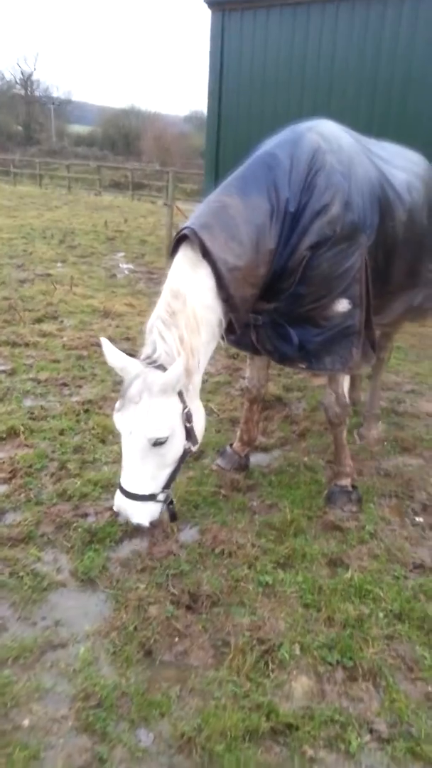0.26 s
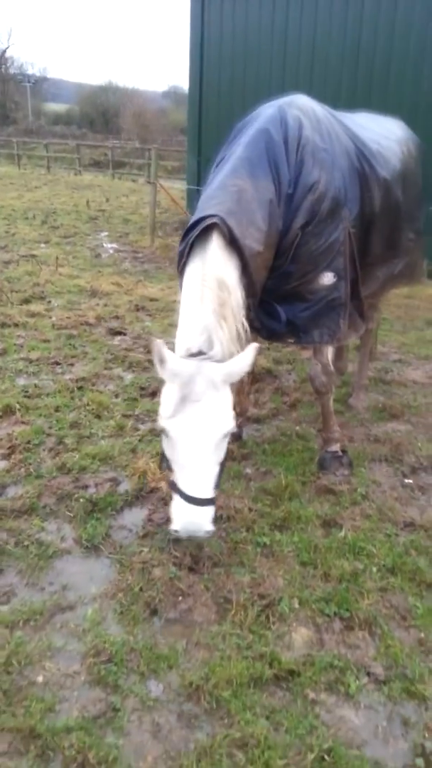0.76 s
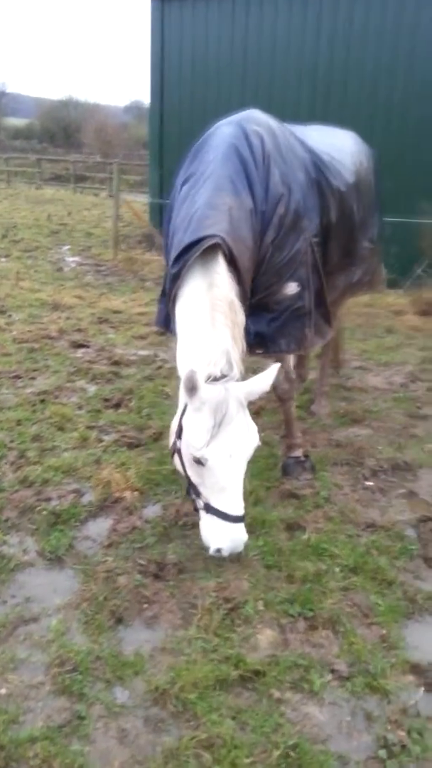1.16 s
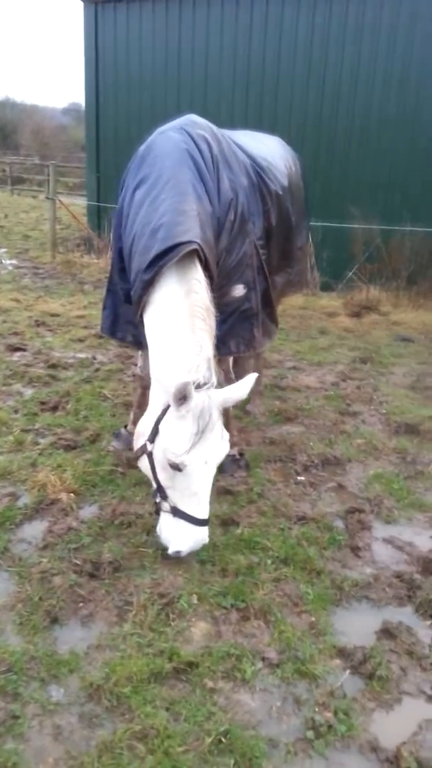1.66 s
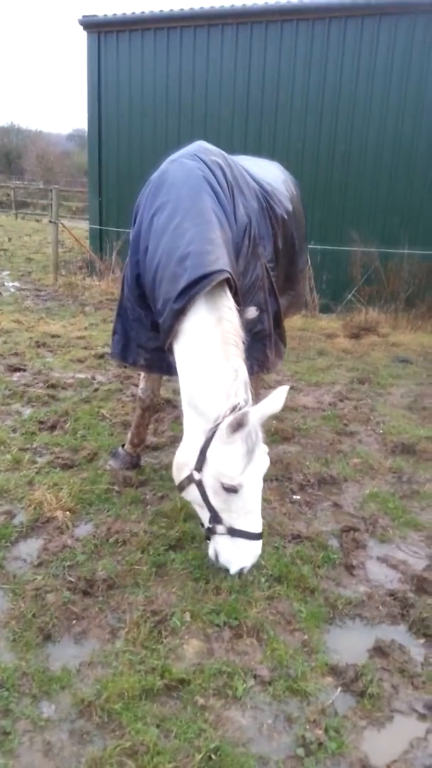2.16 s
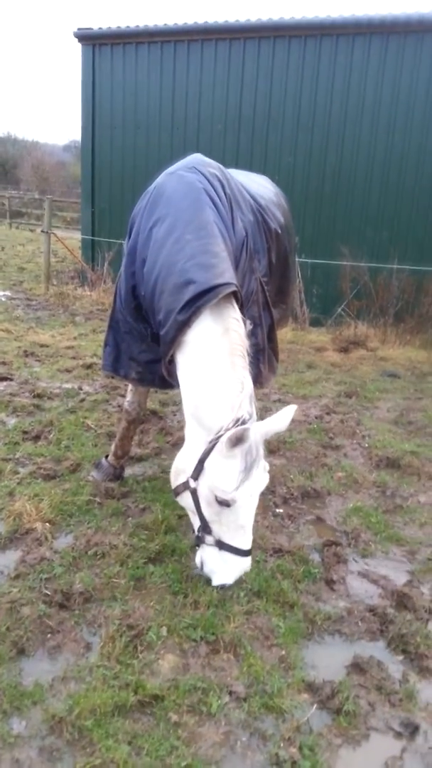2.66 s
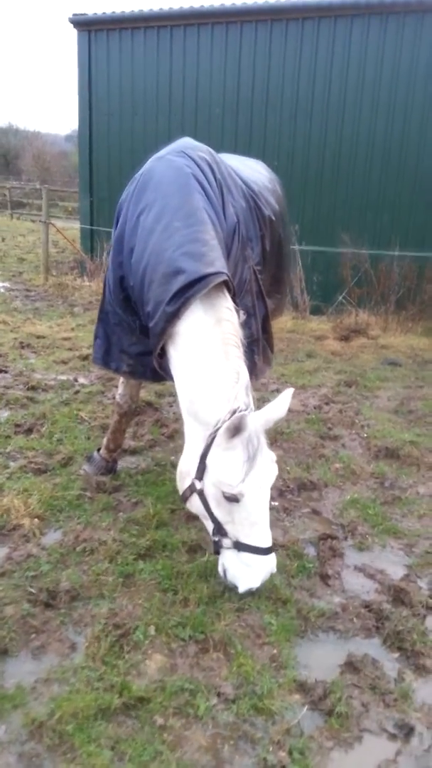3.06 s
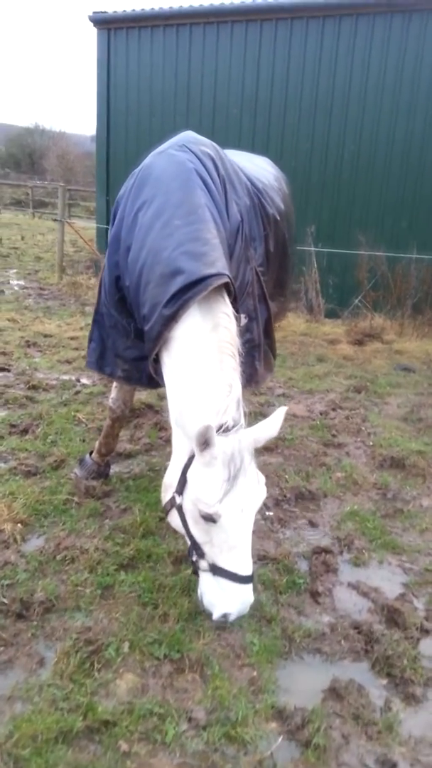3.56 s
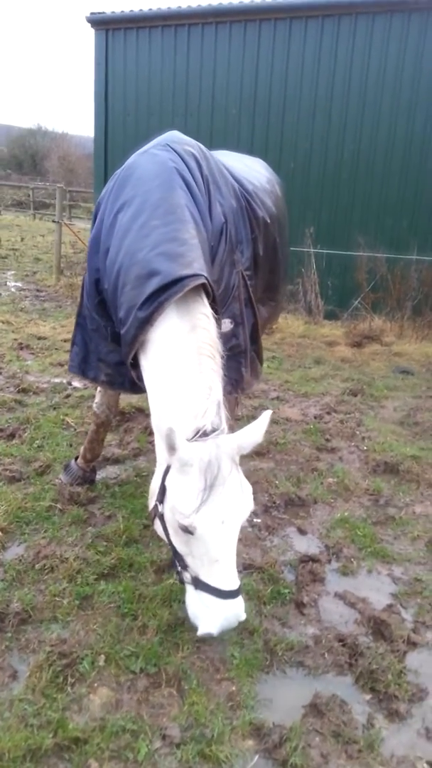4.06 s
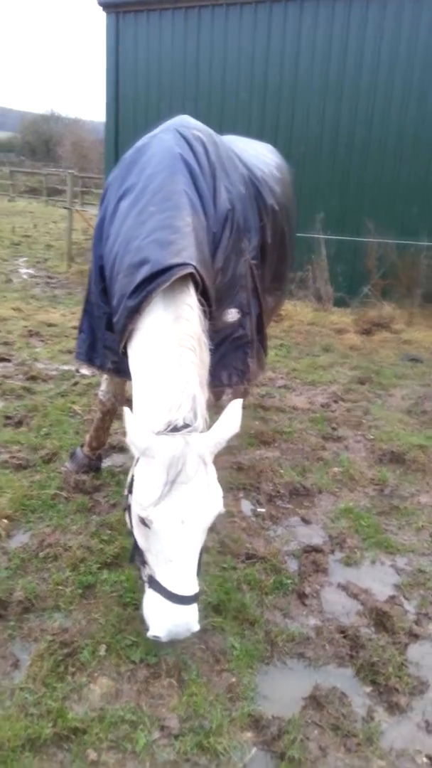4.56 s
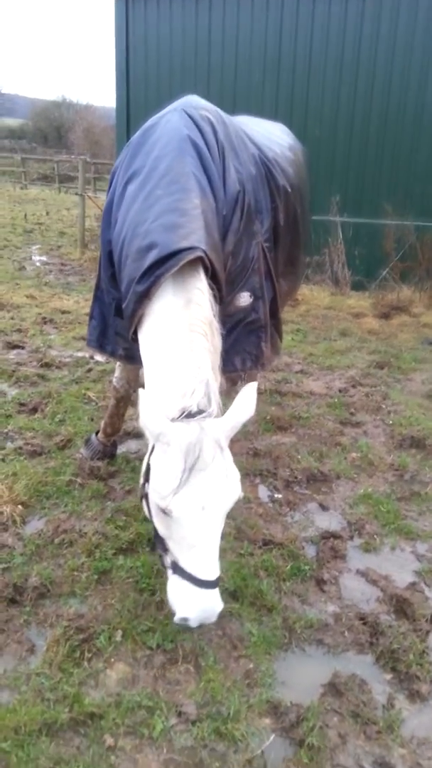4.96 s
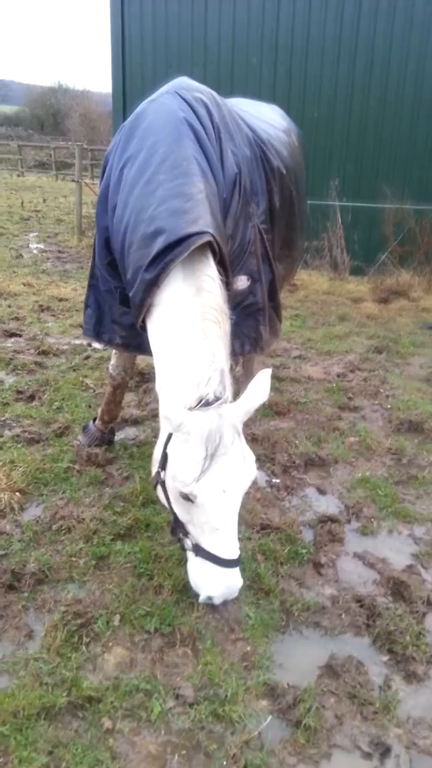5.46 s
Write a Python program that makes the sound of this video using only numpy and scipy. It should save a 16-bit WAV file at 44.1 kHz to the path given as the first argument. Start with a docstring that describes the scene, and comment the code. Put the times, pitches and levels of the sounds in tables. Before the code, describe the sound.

A grazing horse snorts three times up close, with ticking grass and wind buffeting the microphone.

```python
"""A wet paddock, a stereo microphone close to a grazing horse; grass ticks, the countryside hisses far off.
At 0.2 s the muzzle crunches in the turf and the horse snorts: each nostril flutters at its own rate near
30 a second, drifting in and out of step; every flap rings the nasal passage and lets out a puff of air.
Wind buffets the microphone ports, hardest at 1.8 s. Another crunch at 2.4 s leads to a second snort at
2.8 s. The third and longest runs from 4.1 to 5 s, then only grass, wind and the far field are left."""
import sys
import numpy as np
from scipy import signal
from scipy.io import wavfile
from scipy.ndimage import uniform_filter1d

SR = 44100
rng = np.random.default_rng(int(sys.argv[2]) if len(sys.argv) > 2 else 0)


def materialize(psi):
    """Save the field psi as 16-bit PCM at rate SR to the path in sys.argv[1].

    A 1-D psi becomes a single channel; in a 2-D psi each row is a channel.
    """
    bounded = np.clip(np.atleast_2d(psi).T, -1, 1)
    quanta = np.round(bounded * 32767).astype(np.int16)
    wavfile.write(sys.argv[1], SR, quanta)


N = 251811
TIME_S = np.arange(N) / SR


def amp(db):
    """Decibels to gain."""
    return 10 ** (np.asarray(db) / 20)


def rms_one(x):
    """Scale to unit rms."""
    return x / np.sqrt(np.mean(x ** 2) + 1e-20)


def filtered(x, order, hz, kind="low"):
    """Butterworth filter."""
    return signal.sosfilt(signal.butter(order, hz, kind, fs=SR, output="sos"), x)


def in_time(rows):
    """Columns of a curve, sample by sample."""
    times, *columns = np.transpose(rows)
    return [np.interp(TIME_S, times, column) for column in columns]


def at_hz(points, hz):
    """Read a spectrum on a log-frequency axis."""
    frequencies, values = np.transpose(points)
    return np.interp(np.log(hz), np.log(frequencies), values)


def drift(rate_hz):
    """Slow random wander of rms 1."""
    step = 40
    r = np.exp(-2 * np.pi * step * rate_hz / SR)
    slow = signal.lfilter([1], [1, -2 * r, r * r], rng.standard_normal(N // step + 2002))[2000:]
    return np.interp(np.arange(N) / step, np.arange(len(slow)), rms_one(slow))


def ring(x, hz, width_hz):
    """A resonance: each click starts a dying sine."""
    r, w = np.exp(-np.pi * width_hz / SR), 2 * np.pi * hz / SR
    return signal.lfilter([0, np.sin(w)], [1, -2 * r * np.cos(w), r * r], x + 1e-18)


def ring_twice(x, hz, width_hz):
    """A resonance with steep skirts."""
    return ring(ring(x, hz, width_hz), hz, width_hz)


def decay(clicks, time_s):
    """Give each click an exponential tail."""
    return signal.lfilter([1], [1, -np.exp(-1 / (time_s * SR))], clicks)


def swell(middle_s, length_s):
    """A stretch of time and a bell-shaped envelope on it."""
    near = slice(round((middle_s - .1) * SR), round((middle_s + .15) * SR))
    return near, np.exp(-((TIME_S[near] - middle_s) / (.7 * length_s)) ** 2)


def panned(x, pan_db, lag_s=0.00015):
    """Sound reaches the microphone's left port first; pan_db is left minus right."""
    samples = np.arange(len(x))
    late = np.interp(samples - lag_s * SR, samples, x)
    return np.array([x * amp(pan_db / 2), late * amp(-pan_db / 2)])


def banded_noise(spectrum, likeness, patchy_db, flicker_hz):
    """Stereo noise of rms 1 in flickering half-octave bands; likeness is left-right correlation."""
    out, together = 0, drift(flicker_hz)
    edges = 20 * 2 ** np.arange(0, 10, .5)
    white = rng.standard_normal((2, 2, N))
    for k, (low, high) in enumerate(zip(edges, edges[1:])):
        mid, side = filtered(white[k % 2], 2, [low, high], "band")
        hz = np.sqrt(low * high)
        alike = np.clip(at_hz(likeness, hz), -1, 1)
        gain = amp(at_hz(spectrum, hz) + patchy_db * (.5 * together + drift(flicker_hz)))
        out = out + gain * (np.sqrt(1 + alike) * mid + np.sqrt(1 - alike) * side * [[1], [-1]])
    top = filtered(white[1], 2, edges[-1], "high")
    return rms_one(out + np.sqrt(2) * amp(at_hz(spectrum, edges[-1])) * top)


FIELD_SPECTRUM = [(59, -44), (100, -53), (211, -3), (366, 11), (400, -16.5), (504, 3), (844, 3),
                  (991, -0.5), (1490, -3.5), (1910, -3), (2450, -18), (7000, -28), (9100, -62),
                  (15400, -120)]  # distant countryside: frequency_hz, relative_db
FIELD_WIDTH = [(60, 0.3), (130, 0.72), (290, 0.76), (640, 0.63), (1410, -0.032), (3100, 0.62),
               (6820, -0.97), (15000, 1)]  # its stereo image: frequency_hz, likeness
FIELD_LEVEL = [(0.0, -48), (0.9, -45.5), (2.3, -49), (2.9, -47), (3.9, -50), (4.9, -48), (5.71, -50.5)]  # its rise and fall: time_s, level_db


def far_field():
    """The countryside hisses far beyond the paddock, a little to the right."""
    level_db, = in_time(FIELD_LEVEL)
    noise = banded_noise(FIELD_SPECTRUM, FIELD_WIDTH, patchy_db=.8, flicker_hz=5)
    return amp(level_db) * noise * amp([[-1.5], [1.5]])


WIND_SPECTRUM = [(20, -25), (40, -6), (70, -3.5), (130, 1.5), (250, -5), (450, -33), (900, -54),
                 (2000, -100)]  # wind on the microphone: frequency_hz, relative_db
PORT_GUSTS = [(0.021, 0.11, -33.5, 0), (0.34, 0.17, -34, 1), (0.75, 0.47, -38, 1), (0.934, 0.12, -39, 0),
              (1.147, 0.11, -37, 1), (1.356, 0.2, -42.5, 1), (1.614, .15, -33.5, 1), (1.8, 0.079, -26.5, 1),
              (2.11, 0.11, -37.5, 1), (2.29, 0.13, -52, 0), (2.546, 0.21, -39.5, 1),
              (2.647, 0.28, -43.5, 0), (2.94, 0.15, -35, 1), (3.244, 0.2, -37, 1), (3.404, .2, -53, 0),
              (4.11, 0.12, -44, 1), (5.03, 0.23, -49, 1), (5.054, 0.17, -51, 0), (5.35, 0.23, -54, 0),
              (5.618, 0.15, -43, 1), (5.666, .1, -46, 0)]  # gusts on one port: middle_s, length_s, level_db, port (0 left, 1 right)
EDDIES = [(0.253, -20, 200), (0.899, -22.5, 170), (0.92, -21.5, 208), (0.928, -19.5, 255),
          (1.111, -30, 169), (1.171, -29, 245), (1.377, -26, 206), (1.554, -23, 152), (1.563, -23, 195),
          (1.597, -29, 249), (1.709, -23.5, 205), (1.755, -15, 262), (1.762, -14.5, 201),
          (1.797, -15.5, 280), (1.823, -26, 172), (2.481, -26.5, 163), (2.596, -23.5, 185),
          (2.609, -25, 192), (5.016, -22, 142), (5.577, -20, 237)]  # slaps on the right port: start_s, level_db, pitch_hz


def wind(calm_db=-54.5, eddy_left_db=-38):
    """Right on the microphone, gusts swell a lumpy rumble and each eddy is one pressure swing."""
    lumps = banded_noise(WIND_SPECTRUM, [(20, 0), (40, 0.071)], patchy_db=3.5, flicker_hz=24)
    force = np.full((2, N), amp(calm_db))
    for middle_s, length_s, db, port in PORT_GUSTS:
        force[round(port)] += amp(db) * np.exp(-(2 * (TIME_S - middle_s) / length_s) ** 2)
    out = force * rms_one(filtered(lumps, 3, [32, 480], "band"))
    for start_s, db, hz in EDDIES:
        cycles = np.arange(-2, 2, hz / SR)
        swing = -np.sin(2 * np.pi * cycles) * np.exp(-(cycles / 0.36) ** 2)
        at = round(start_s * SR + SR / hz / 2) - len(swing) // 2
        out[:, at:at + len(swing)] += 2 * amp(db) * swing * [[amp(eddy_left_db)], [1]]
    return out


def scatter(x, t60_s=0.34, level_db=-20.5):
    """Ground and shed wall return a short dull tail, unrelated at the two ports."""
    t = TIME_S[:round(.4 * SR)]
    tail = rng.standard_normal((2, len(t))) * amp(-60 * t / t60_s) * (t > .006)
    tail = filtered(tail, 1, 2500)
    tail /= np.sqrt(np.sum(tail ** 2, axis=1, keepdims=True))
    return amp(level_db) * signal.fftconvolve(x, tail, axes=1)[:, :N]


GRASS_LEVEL = [(0.0, -54.5), (0.2, -47), (0.9, -55.5), (1.17, -52.5), (1.35, -57), (1.52, -50.5),
               (1.85, -58.5), (2.45, -55.5), (3.6, -62), (5.71, -60.5)]  # grass at the muzzle: time_s, level_db


def rustle(grains_per_s=2500):
    """The muzzle brushes the grass: dense soft grains, mostly at the right port."""
    grains = rng.standard_normal((2, N)) * (rng.random((2, N)) < grains_per_s / SR)
    band = rms_one(filtered(grains, 2, (1380, 4450), "band"))
    level_db, = in_time(GRASS_LEVEL)
    return amp(level_db + 2.6 * drift(4.7)) * band * amp([[-3], [3]])


def ticks(rows, damping):
    """Each tick is a click and a brief ring; damping is width over pitch."""
    length = 400
    out = np.zeros((2, N + length))
    click = filtered(signal.unit_impulse(length), 2, 900, "high")
    for start_s, db, hz, pan_db in rows:
        at = round(start_s * SR)
        out[:, at:at + length] += panned(amp(db) * ring(click, hz, damping * hz), pan_db)
    return out[:, :N]


def faint_ticks(per_s=25, base_db=-45):
    """The wet turf ticks weakly at random moments and pitches."""
    when, strength, pitch, side = rng.random((round(per_s * N / SR), 4)).T
    level_db = base_db - 5 * np.log(strength + .05)
    return ticks(zip(when * N / SR, level_db, 1500 * 4.5 ** pitch, 3 - 12 * side), damping=0.15)


GRASS_TICKS = [(0.1258, -27.5, 2470), (0.1521, -20, 3100), (1.086, -32, 4600), (1.1117, -23, 4000),
               (1.1707, -14.5, 1660), (1.6228, -18.5, 1780), (1.6672, -18, 4030), (1.68, -23, 4800),
               (1.8278, -17.5, 1420), (2.2302, -20, 1630), (2.2743, -27, 2840), (2.6503, -22.5, 2200),
               (2.77, -17.5, 1810), (2.9511, -11, 2360), (3.3884, -11.5, 1430), (3.4056, -14, 1660),
               (3.481, -21.5, 3100), (3.5365, -21, 2570), (3.5795, -23, 4080), (3.7106, -24.5, 1880),
               (3.9936, -18.5, 1400), (4.2104, -11, 2630), (4.9123, -13.5, 2320), (5.2882, -24, 1570),
               (5.329, -22.5, 2060), (5.4343, -24.5, 1700), (5.5726, -15.5, 2260), (5.6007, -22, 4950)]  # the loudest ticks: start_s, level_db, pitch_hz


def grass_ticks(pan_db=-11.5):
    """Grass and droplets tick sharply to the right of the microphone."""
    return ticks([(*row, pan_db) for row in GRASS_TICKS], damping=1.0)


TURF_CRUNCHES = [(0.18, -36, 1710, 0.032, -19), (0.189, -19, 1224, 0.012, -3),
                 (0.218, -25.5, 1390, 0.027, -6.5), (2.418, -28, 955, 0.0037, -20),
                 (2.429, -15, 953, 0.0098, -9), (2.44, -21.5, 1010, 0.0026, -4)]  # muzzle in wet turf: middle_s, peak_db, pitch_hz, length_s, pan_db
POCKET_MODES = [(1, 228, 9.5), (2.02, 276, 3.5), (3.0, 352, -1.5), (3.85, 433, -4)]  # rings of a pocket in the turf: pitch_ratio, width_hz, level_db


def crunches(grains_per_s=5000):
    """The muzzle crunches the turf: a short swell of grains rings a pocket and its overtones."""
    out = np.zeros((2, N))
    grains = rng.standard_normal(N) * (rng.random(N) < grains_per_s / SR)
    grains = np.diff(grains, prepend=0)
    for middle_s, db, hz, length_s, pan_db in TURF_CRUNCHES:
        near, bell = swell(middle_s, length_s)
        rung = sum(amp(mode_db) * ring(grains[near] * bell, ratio * hz, width)
                   for ratio, width, mode_db in POCKET_MODES)
        rung = filtered(rung, 2, 3200)
        out[:, near] += panned(amp(db) * rung / np.abs(rung).max(), pan_db)
    return out


MUCUS_SQUEAKS = [(0.317, -23, 2800, 0.0062), (0.339, -32, 4700, 0.0032), (0.365, -29, 2540, 0.0036),
                 (0.37, -23, 2540, 0.0012), (0.441, -34, 2070, .003), (0.942, -37.5, 3040, 0.0089),
                 (2.99, -32.5, 2750, 0.0039), (3.265, -31.5, 3680, 0.0037), (3.278, -34, 4500, .008),
                 (4.399, -32, 3800, .006), (4.414, -28, 3270, 0.012), (4.448, -32, 3370, 0.014)]  # wet squeaks in the nose: middle_s, level_db, pitch_hz, length_s


def squeaks():
    """Mucus squeaks in the air stream: short swells of noise through one resonance, hard right."""
    out, noise = np.zeros(N), rng.standard_normal(N)
    for middle_s, db, hz, length_s in MUCUS_SQUEAKS:
        near, bell = swell(middle_s, length_s)
        rung = ring_twice(noise[near] * bell, hz, 0.3 * hz)
        out[near] += amp(db) * rung / np.abs(rung).max()
    return panned(out, pan_db=-25.5)


def flaps(nostril, level_db, jitter_s, uneven_db=1.0, lead_s=.0018):
    """One click each time a nostril's flutter completes a turn, a little uneven in time and strength."""
    clicks = np.zeros(N)
    for rows in nostril:
        rate, = in_time(rows)
        start, end = round(rows[0][0] * SR), round(rows[-1][0] * SR)
        turns = np.floor(np.cumsum(rate[start:end]) / SR)
        at = start + np.flatnonzero(np.diff(turns, prepend=-1))
        timing, strength = rng.standard_normal((40, 2))[:len(at)].T
        shift = np.round((jitter_s * timing - lead_s) * SR).astype(int)  # the flap leads its ring's peak
        clicks[at + shift] = amp(level_db[at] + uneven_db * strength)
    return clicks


FIRST_FLUTTER = [
    [(0.279, 29.3), (0.373, 29.9), (0.466, 29.4), (0.56, 29.7), (0.654, 30.7), (0.748, 29.2), (0.841, 27.7),
     (0.935, 25.8)],
    [(2.836, 31.3), (2.915, 32.3), (2.994, 29.7), (3.073, 30.1), (3.151, 30.9), (3.23, 33.7), (3.309, 32.5),
     (3.388, 24.5)],
    [(4.167, 33.2), (4.243, 36.2), (4.319, 33.9), (4.395, 34.9), (4.471, 37.0), (4.547, 38.4),
     (4.623, 38.3), (4.699, 38.5), (4.775, 33.7), (4.851, 34.9), (4.927, 30.2)],
]  # first nostril, a list per snort: time_s, flaps_per_s
SECOND_FLUTTER = [
    [(0.289, 34.8), (0.39, 28.2), (0.49, 25.5), (0.591, 25.8), (0.692, 26.9), (0.792, 24.7), (0.893, 23.1)],
    [(2.825, 30.1), (2.921, 27.6), (3.018, 27.3), (3.114, 26.4), (3.21, 29.3), (3.307, 29.2), (3.403, 24.4)],
    [(4.228, 31.9), (4.316, 30.3), (4.404, 30.1), (4.492, 34.5), (4.58, 33.4), (4.668, 34.0), (4.756, 32.5),
     (4.844, 30.1), (4.932, 20.9)],
]  # second nostril, a list per snort: time_s, flaps_per_s
FLAP_STRENGTH = [
    [(0.279, -16, -5), (0.318, -0.5, 0.5), (0.352, -0.5, -1), (0.385, -5.5, -0.5), (0.425, -6.5, -5.5),
     (0.498, -11, -31), (0.571, -12, -10), (0.643, -12, -14), (0.716, -19, -13), (0.789, -10, -24),
     (0.862, -9.5, -21), (0.935, -21.5, -61)],
    [(2.825, -9.5, -23), (2.897, 1, 2), (2.93, -2.5, 1.5), (2.97, -3, -7.5), (3.042, -9, -14.5),
     (3.114, -10.5, -21), (3.186, -1, -5), (3.222, 2.5, -2), (3.258, -3, -1), (3.331, 3, -8.5),
     (3.403, -23, -22)],
    [(4.167, -24, -7), (4.197, -5, -14), (4.226, -4, -2), (4.26, -1, -12), (4.32, -5, -7.5),
     (4.396, -2, -24), (4.473, -1, -6), (4.55, -1, -1), (4.626, -7.5, 2), (4.703, 1.5, -3.5),
     (4.779, -7, 0), (4.856, -18.5, -0.5), (4.932, -13.5, -11)],
]  # both nostrils, a list per snort: time_s, first_db, second_db


def flutter(lock_s=.0022):
    """Both nostrils flap; near misses pull into step through the shared airway and their powers add."""
    first_db, second_db = in_time(np.vstack(FLAP_STRENGTH))
    clicks = flaps(FIRST_FLUTTER, first_db, jitter_s=0.00034)
    second = flaps(SECOND_FLUTTER, second_db, jitter_s=0.00028)
    leads = np.flatnonzero(clicks)
    for at in np.flatnonzero(second):
        nearest = leads[np.argmin(np.abs(leads - at))]
        landing = nearest if abs(nearest - at) < lock_s * SR else at
        clicks[landing] = np.hypot(clicks[landing], second[at])
    return clicks


# The three breaths: start_s, end_s, air_db, upper_rings_db, pan_db, rebound_db, rasp_db,
# chest_hz, chest_width_hz, nasal_widening_hz
BREATHS = [(0.214, 0.98, -54.5, -8.5, -3, -21, -21, 318, 160, 39),
           (2.8, 3.453, -61.5, -12, -4, -25, -7.5, 308, 161, 30),
           (4.14, 5.015, -50, -11, -2, -12.5, -2, 296, 92, 0)]


def breath(upper_db_per_db=-0.16):
    """Effort, the strength of both nostrils together, raises the air and eases the upper rings back."""
    effort_db = 20 * np.log10(amp(in_time(np.vstack(FLAP_STRENGTH))).sum(axis=0))
    blowing, levels_db = np.zeros(N), np.zeros((5, N))
    for start_s, end_s, air_db, upper_db, pan_db, rebound_db, rasp_db, *_ in BREATHS:
        now = (TIME_S > start_s) & (TIME_S < end_s)
        around = (TIME_S > start_s - .1) & (TIME_S < end_s + .1)
        levels_db[0, around] = air_db + effort_db[around]
        levels_db[1, around] = upper_db + upper_db_per_db * (effort_db[around] - effort_db[now].mean())
        levels_db[2:, around] = [[pan_db], [rebound_db], [rasp_db]]
        blowing[now] = 1
    return (uniform_filter1d(blowing, size=2000), *levels_db)  # the stream starts and stops softly


JET_SPECTRUM = [(1000, -32), (2000, -7), (3200, -5), (3900, -16.5), (4600, -3), (5400, -7.5), (6300, -13.5),
                (10000, -9.5), (15000, -73)]  # air leaving the nostrils: frequency_hz, relative_db
JET_WIDTH = [(1000, 0.29), (3000, 1), (7000, -0.15), (15000, 0.13)]  # its stereo image: frequency_hz, likeness


def jet(rasp_db):
    """The jet hisses close to the microphone and rasps in a resonance at the rim of the nostril."""
    hiss = banded_noise(JET_SPECTRUM, JET_WIDTH, patchy_db=2.5, flicker_hz=14.4) * amp([[-3], [3]])
    rasp = rms_one(ring_twice(rng.standard_normal(N), hz=5040, width_hz=1800))
    return hiss + amp(rasp_db) * panned(rasp, pan_db=-9.5)


UPPER_MODES = [(1360, 197, 3, -1), (1471, 62, -12.5, 2), (2370, 110, -0.5, -3.5), (3110, 200, 1, -0.5),
               (4320, 700, -8, -8.5), (4900, 1500, -16, -13)]  # high rings of the airway: pitch_hz, width_hz, level_db, extra_pan_db


def upper_rings(drive, clicks, upper_db, pan_db):
    """Flaps and the air escaping after each one feed the airway's high resonances."""
    rush = 0.55 * drive + 0.035 * decay(clicks, time_s=0.011) * rng.standard_normal(N)
    out = np.zeros((2, N))
    for hz, width, db, extra_pan_db in UPPER_MODES:
        rung = ring_twice(rush, hz, 1.79 * width) * 2 * np.pi * width / SR
        out += panned(amp(upper_db + db) * rung, pan_db + extra_pan_db)
    return out


NASAL_MODES = [(577.6, 107, -7), (555, 77, -15), (657.3, 29, -19)]  # main rings of the nasal passage: pitch_hz, width_hz, level_db


def airway(x, chest_db, spread_db=1.2):
    """Chest and nasal passage ring, set anew for each snort; the nasal shares vary from flap to flap."""
    out = np.zeros(N)
    shares = [amp(spread_db * drift(25)) for _ in NASAL_MODES]
    for start_s, end_s, *_, chest_hz, chest_width, widening in BREATHS:
        snort = x * ((TIME_S > start_s) & (TIME_S < end_s))
        out += amp(chest_db) * ring(snort, chest_hz, chest_width)
        for (hz, width, db), share in zip(NASAL_MODES, shares):
            out += amp(db) * ring(snort * share, hz, width + widening)
    return filtered(out, 6, 215, "high")  # a small opening radiates no bass


BREATH_COLOUR = [
    [(0.24, -57.5, 0), (0.32, -44.5, -17), (0.45, -47.5, -5), (0.68, -74, -3.5), (0.916, -62, -9),
     (0.99, -48, -6)],
    [(2.8, -71, 1), (2.882, -48.5, -16), (3.004, -53.5, -6.5), (3.142, -63, -3.5), (3.228, -48, -18.5),
     (3.36, -53, -5.5), (3.44, -53.5, -18)],
    [(4.15, -57, -1), (4.228, -47, -5), (4.45, -46, -5), (4.6, -51.5, -12.5), (4.72, -53, -13),
     (4.79, -55.5, -8.5), (4.9, -52.5, -5), (5.0, -53, -12)],
]  # tone of the breath, a list per snort: time_s, jet_db, chest_db


def snorts(rebound_s=.0066):
    """Close up, flaps and turbulent air ring the airway; the jet flares with every flap."""
    blowing, air_db, upper_db, pan_db, rebound_db, rasp_db = breath()
    jet_db, chest_db = in_time(np.vstack(BREATH_COLOUR))
    clicks = flutter()
    puff = decay(clicks, time_s=0.0061)  # air escapes while the nostril stands open
    puff /= uniform_filter1d(puff, size=4000) + 0.0004
    drive = clicks + blowing * amp(air_db) * (.5 + 1.62 * puff) * rng.standard_normal(N)
    # the wing of the nostril bounces once after each flap
    rebound = np.roll(clicks, round(rebound_s * SR)) * amp(rebound_db + 1.4 * rng.standard_normal(N))
    fleshy = filtered(drive + rebound, 4, 1020)  # soft tissue closes gently
    body = panned(airway(fleshy, chest_db), pan_db)
    upper = upper_rings(drive, clicks, upper_db, pan_db)
    flare = blowing * amp(jet_db) * (1.025 + 0.27 * puff)
    return body + upper + flare * jet(rasp_db)


def scene():
    """The paddock from the microphone: horse and turf near, wind on the ports, the field far off."""
    field = far_field()
    horse = snorts() + squeaks() + crunches()
    turf = grass_ticks() + rustle() + faint_ticks()
    return horse + scatter(horse) + turf + wind() + field


MIC_HISS = [(1500, -13), (3000, 5), (6000, -1), (9000, 5), (14500, 2)]  # the microphone's own noise: frequency_hz, relative_db


def record(dry, hiss_db=-54, bass_cut_hz=43, top_cut_hz=14800):
    """The microphone hisses and loses deep bass; the loudest peaks are rounded, the top is cut."""
    hiss = banded_noise(MIC_HISS, [(1000, 0), (2000, 0)], patchy_db=0, flicker_hz=1)
    heard = dry + amp(hiss_db) * hiss * amp([[-1.5], [1.5]])
    heard = filtered(heard, 1, bass_cut_hz, "high")
    rounded = heard / (1 + np.abs(heard / .97) ** 6) ** (1 / 6)
    return signal.sosfilt(signal.ellip(10, .5, 60, top_cut_hz, fs=SR, output="sos"), rounded)


dry = scene()
out = record(dry)
materialize(out)
```